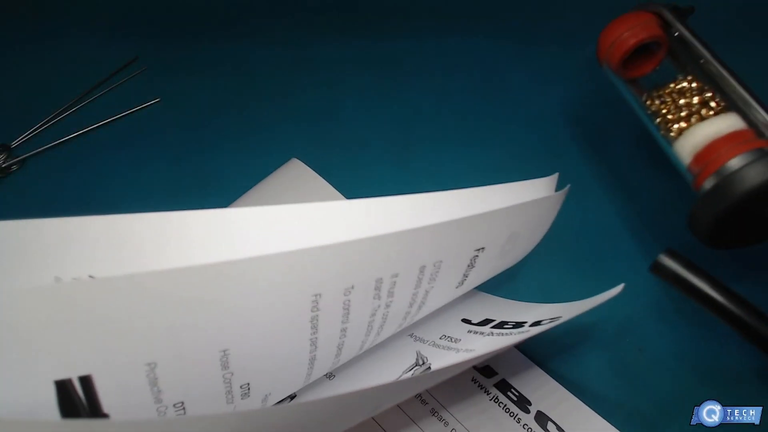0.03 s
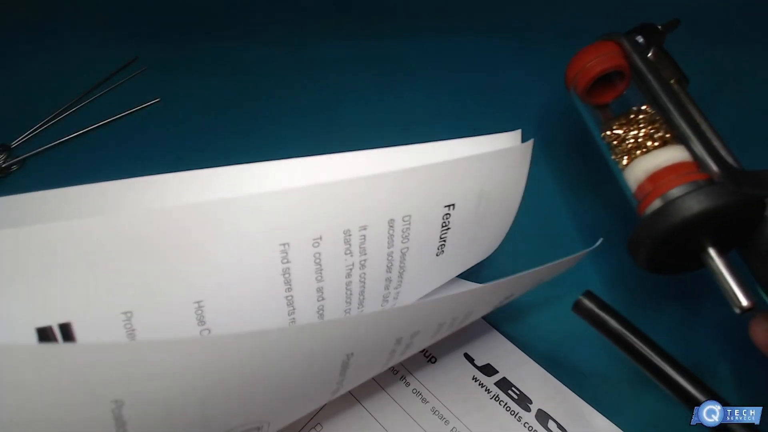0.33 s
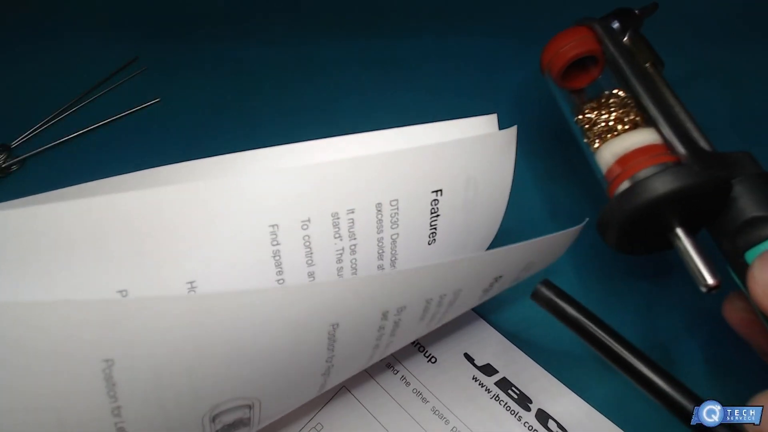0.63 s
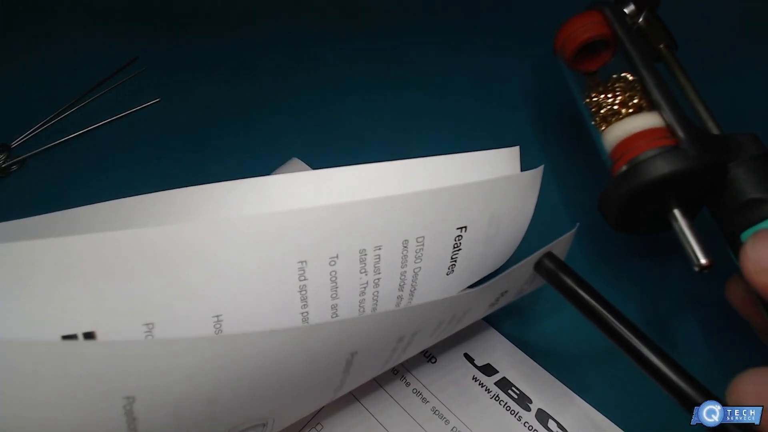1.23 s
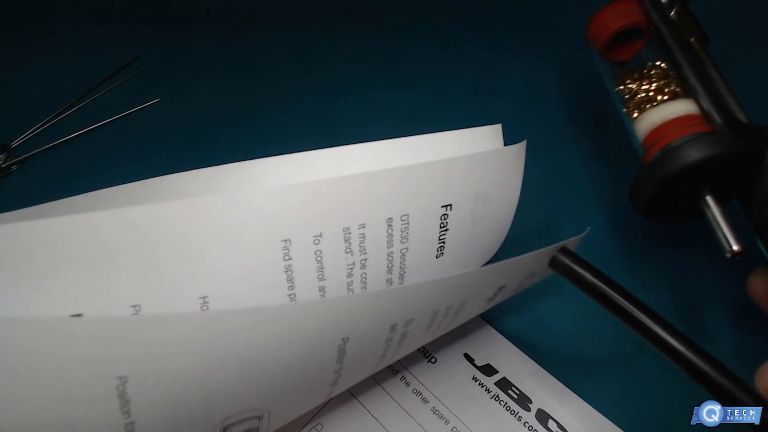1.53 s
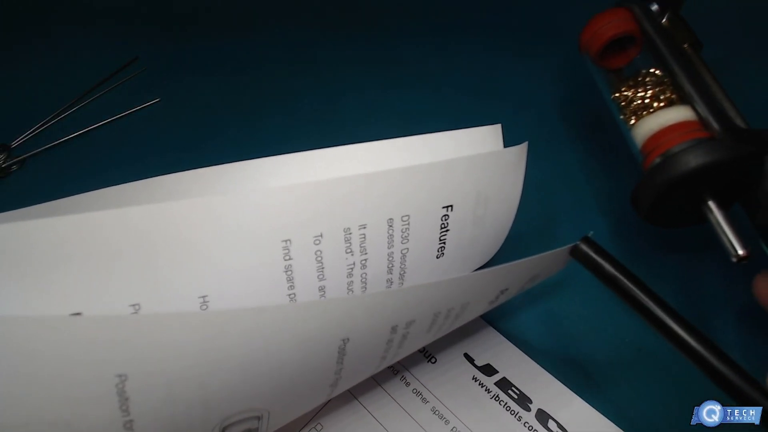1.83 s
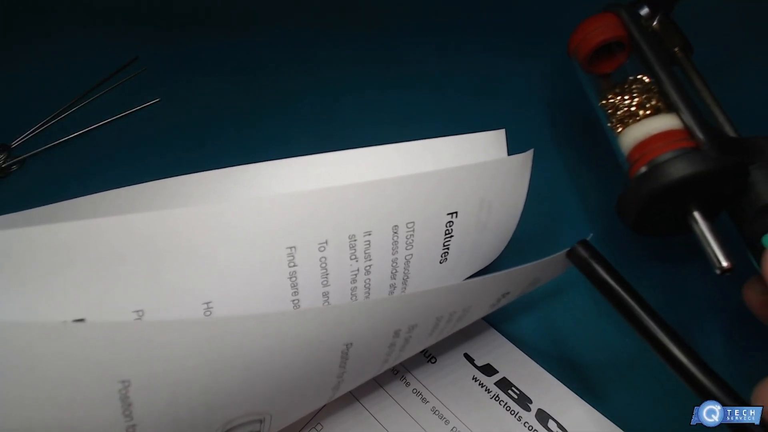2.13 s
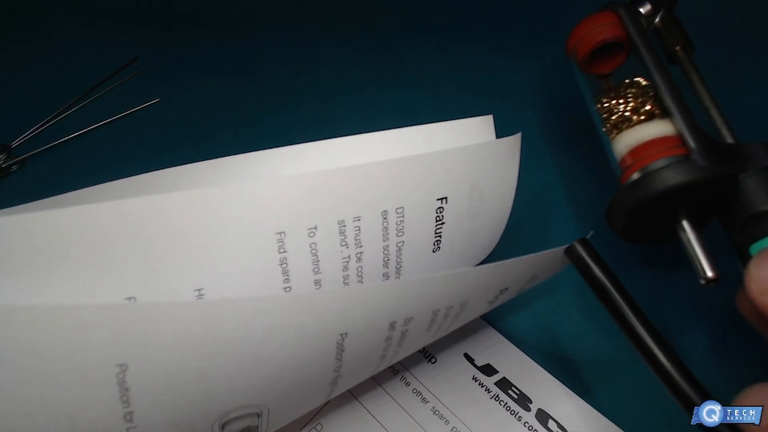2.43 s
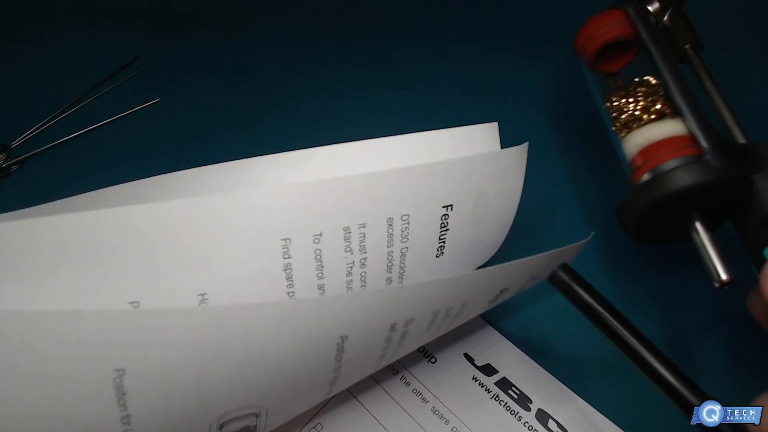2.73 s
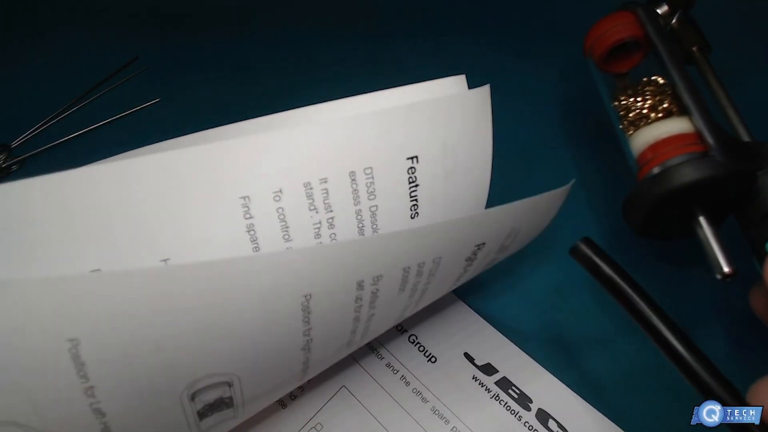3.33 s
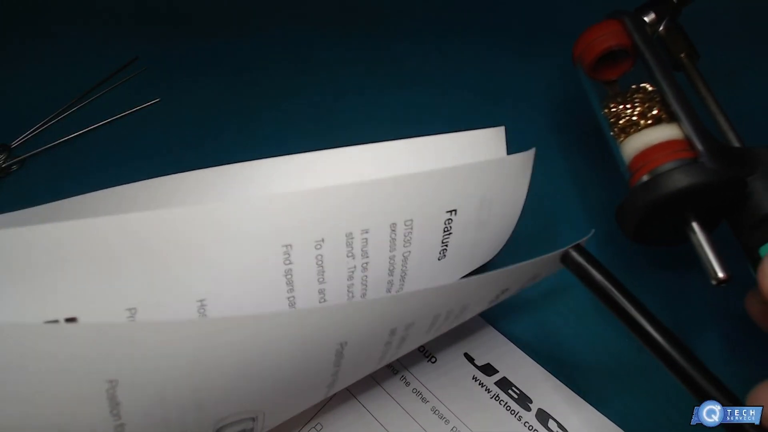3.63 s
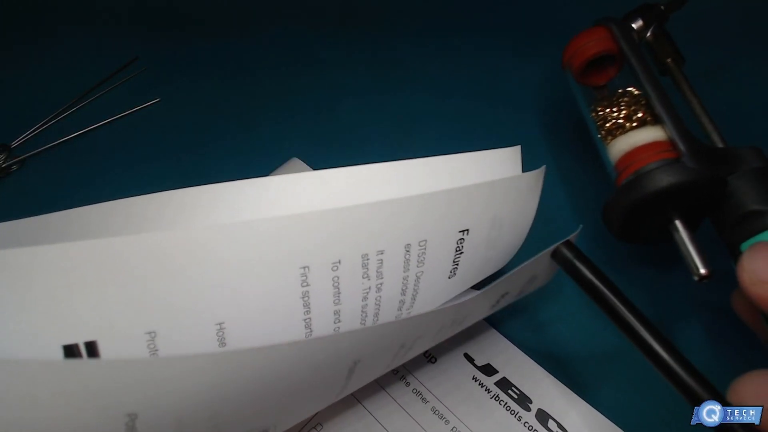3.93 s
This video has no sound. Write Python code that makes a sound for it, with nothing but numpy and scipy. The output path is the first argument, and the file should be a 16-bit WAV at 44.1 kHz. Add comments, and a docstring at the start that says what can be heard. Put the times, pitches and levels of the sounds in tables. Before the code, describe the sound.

Small electric pump clacks on, buzzes and hisses steadily, briefly faltering with a rattle.

```python
"""A small workshop, stereo microphone close to the bench, where a little electric diaphragm pump starts,
hums at about 80 turns a second, stumbles once and picks up again. Every turn shakes the housing, ticks
the valves and pushes a puff of air; the mechanism rattles and clacks whenever it spins up.
Behind it, to the right, a fan drones faintly in the room tone."""
import sys
import numpy as np
from scipy import signal
from scipy.fft import rfft, irfft, next_fast_len
from scipy.io import wavfile
from scipy.ndimage import map_coordinates

SR = 44100
rng = np.random.default_rng(int(sys.argv[2]) if len(sys.argv) > 2 else 0)


def generate_wav(sig):
    """Save sig (samples, or channels by samples) to the path in sys.argv[1] as 16-bit PCM at SR."""
    pcm = np.round(np.clip(np.atleast_2d(sig).T, -1, 1) * 32767).astype(np.int16)
    wavfile.write(sys.argv[1], SR, pcm)


N = 176400
RATED_HZ = 79  # turns a second in steady running
PUFF_PLACE = 0.68  # where in the turn (0-1) the air is pushed out


def hum(turns, speed_hz, slow):
    """The housing hums at multiples of the speed; the upper lines flutter and stir the room."""
    # housing lines (multiple of the speed, left level [dB], right level [dB], lead of the left [rad])
    lines = [(1, -32, -50, 1.5), (2, -35, -38, -1.0), (3, -29, -36, 1.3), (4, -27, -25, -1.2),
             (5, -25, -32, 1.4), (6, -39, -47, 2.4), (7, -46, -49, 0.4), (8, -39, -37, -1.5),
             (9, -37, -39, 2.4), (10, -36, -45, 2.9), (11, -35, -47, 2.5), (12, -39, -50, -2.8),
             (13, -37, -46, -1.0), (14, -47, -50, -1.9), (15, -44, -48, 0.0), (16, -53, -51, -0.4),
             (17, -45, -56, 0.7), (18, -50, -55, 0.9), (19, -60, -55, 2.5), (20, -50, -52, 0.3),
             (21, -53, -60, 1.2), (22, -49, -58, 0.8), (23, -57, -61, 0.0), (24, -53, -56, 0.5),
             (25, -51, -56, 1.1), (26, -55, -59, 1.4), (27, -54, -57, -0.4)]
    # swell of the strongest line, the fourth (time [s], gain [dB])
    fourth_swell = [(.59, -12.5), (.69, -10.5), (.79, 0), (1.25, 0.5), (1.58, 3.5), (1.8, -8), (2.02, -7),
                    (2.07, -8), (2.19, -9), (2.29, 0.5), (2.52, 2.5), (2.75, -1.5), (3.17, 2), (3.33, -3.5),
                    (3.44, 3), (3.66, -2.5), (3.86, 2.5), (4, 0)]
    swell_db = {4: curve(fourth_swell), 5: 0.21 * curve(fourth_swell)}
    thud_place, thud_scatter_cycles = 0.09717, 0.166  # the upper lines add up to one thud a turn
    flutter_db = 1.15 + 0.2634 * np.maximum(speed_hz - RATED_HZ, 0)
    stumble_db, stumble_rad = 3.5, 0.662  # the low lines waver at low speed
    speeds = np.linspace(40, 90, 500)
    low, upper = np.zeros((2, N)), np.zeros((2, N))
    for k, left_db, right_db, lead in lines:
        phase = 2 * np.pi * k * (turns - thud_place) + np.array([[lead], [-lead]]) / 2
        lift_db = np.interp(speed_hz, speeds, resonance_db(k * speeds) - resonance_db(k * RATED_HZ))
        size = np.sqrt(2) * amp([[left_db], [right_db]]) * amp(lift_db)
        if k <= 5:
            dispersion = 2 * np.pi * 0.164 * k ** 2  # the mounts spread these lines over the turn
            line = np.sin(phase - dispersion + stumble_rad * slow * wobble(55))
            low += size * line * amp(swell_db.get(k, 0) + stumble_db * slow * np.tanh(wobble(55)))
        else:
            line = np.sin(phase + 2 * np.pi * thud_scatter_cycles * rng.standard_normal())
            upper += size * line * amp(flutter_db * wobble(22.033))
    upper *= amp(-5 * slow)
    room_echo = amp(-11.5) * ring(upper, t60=0.377)
    return amp(-0.5) * (low + upper + room_echo)


def resonance_db(hz):
    """Lift that housing and bench give to a line as it crosses their resonances."""
    # resonances (centre [Hz], half width [Hz], boost [dB])
    modes = [(190, 16.6, -1), (322, 23.5, 3), (626.9, 16.47, 7.5), (865.5, 21, 10), (940.8, 4, 8.5),
             (1003, 13, 4.5), (1009.7, 16.6, 6.5), (1067, 13.7, -1), (1135.3, 18, 4.5), (1264, 4.4, 1),
             (1378.5, 11.7, 3.5), (1470, 14.3, 2), (1734, 27, 10), (1802, 21.5, 9.5), (1948, 28, 4)]
    return sum(db / (1 + ((hz - centre) / width) ** 2) for centre, width, db in modes)


def valves(turns):
    """Left of centre the valves tick several times a turn, and each stroke buzzes in the housing."""
    # valve ticks (place in the turn [0-1], relative level [dB])
    tick_pattern = [(.4, -7.5), (.5, 15), (.6, 4), (.7, 4), (0.819, -1.5)]
    # spectrum of the ticks (frequency [Hz], relative level [dB])
    tick_colour = [(1000, -24.5), (2000, -11), (2400, -4), (2850, -9), (3300, -32.5), (3750, -13),
                   (4200, -0.5), (5300, -8), (5900, -5), (7200, -2), (8300, 1), (9300, -11.5),
                   (10000, -4.5), (10800, -1.5), (11900, -32), (13200, -6), (15800, -27)]
    # spectrum of the housing's buzz (frequency [Hz], relative level [dB])
    buzz_colour = [(900, -15.5), (1500, -8), (2000, 0), (2400, -6), (2800, 8.5), (3300, -14), (3750, 4),
                   (4200, 0), (4700, -3.5), (5300, -3), (5900, -7.5), (6500, -6), (7500, -6.5),
                   (11000, -12), (15000, -33)]
    ticks = sum(amp(db) * ring(strokes(turns, place), t60=0.00261) for place, db in tick_pattern)
    ticks = coloured(ticks + amp(8.5) * ring(ticks, t60=0.36), tick_colour)
    buzz = coloured(ring(strokes(turns, place=0.75), t60=0.0918), buzz_colour)
    return amp(-48.5) * ticks * pan(3.2) + amp(-45) * buzz * pan(0.33)


def snap(turns):
    """A valve closes with a bright snap: a repeating ring and a spurt of air."""
    # spectrum of the snap (frequency [Hz], relative level [dB])
    colour = [(2000, -20), (3500, -8.5), (4200, -22.5), (5200, -19.5), (5900, -8), (7200, -8.5),
              (8400, 3.5), (9300, -6.5), (9950, 3.5), (10250, -5), (10650, 0.5), (11900, -9), (13300, 6.5),
              (14200, -22.5), (16000, -24.5)]
    place, t60 = 0.7, 0.009
    ringing = coloured(ring(strokes(turns, place, jitter_s=3e-6), t60), colour)
    since_closing_s = ((turns - place) % 1) / RATED_HZ
    spurt = unit(amp(-60 * since_closing_s / t60)) * noise(colour)
    return amp(-50) * (ringing + amp(-2) * spurt)


def airflow(turns):
    """Each turn pushes out a puff of hiss over a lower rush."""
    # spectrum of the puff (frequency [Hz], relative level [dB])
    puff_colour = [(880, -48.5), (1500, -4.5), (1540, -5), (1960, -4), (2480, -13.5), (2930, -0.5),
                   (3270, -23), (4100, -5.5), (5290, -17.5), (5780, -1), (7260, -18), (8490, -5),
                   (9370, -10), (10900, -21.5), (11900, -29.5), (13200, -6), (15800, -35)]
    # spectrum of the rush (frequency [Hz], relative level [dB])
    rush_colour = [(30, -11), (100, -4.5), (200, -12), (300, -0.5), (500, -6.5), (800, -5.5), (1200, -10),
                   (2000, -16), (3200, -16), (6000, -23.5)]
    puff = throb(turns - PUFF_PLACE, depth_db=1.5) * noise(puff_colour)
    rush = throb(turns, depth_db=1) * noise(rush_colour)
    return amp(-48.5) * puff * pan(3.6) + amp(-41) * rush


def strain(turns, speed_hz):
    """The air hisses more sharply when the load drags the motor down."""
    # spectrum of the labouring hiss (frequency [Hz], relative level [dB])
    colour = [(3000, -23), (5300, -9.5), (5900, -4.5), (6500, -13), (7600, -5), (8400, -2.5), (9200, -12),
              (12000, -26)]
    load = np.clip(RATED_HZ - speed_hz, 0, 1)
    return amp(-48) * load * throb(turns - PUFF_PLACE, depth_db=2.8) * noise(colour)


def rattle(turns, slow):
    """Below its rated speed the pump shakes on its mounts."""
    # spectrum of the rattle (frequency [Hz], relative level [dB])
    colour = [(40, -16.5), (110, -10.5), (180, -28), (350, 12), (500, 0.5), (700, -2), (1100, 0.5),
              (1800, -13.5), (3000, -17), (8000, -25), (15000, -47)]
    return amp(-30.5) * slow ** 0.396 * throb(turns, depth_db=2.27) * noise(colour)


def jolt(turns):
    """The body lurches on its mounts at switch-on: a thump, dead centre, at three times the speed."""
    peak_s, width_s = 0.5974, 0.0218
    swell = np.exp(-((np.arange(N) / SR - peak_s) / width_s) ** 2)
    return np.sqrt(2) * amp(-25) * swell * np.sin(3 * 2 * np.pi * turns)


def clacks():
    """Short bright knocks as the mechanism takes up the load."""
    # knocks on spinning up (time [s], level [dB], time to fall 60 dB [s])
    knocks = [(.556, -40, 0.042), (0.572, -37, 0.038), (.591, -31.5, 0.039), (0.604, -37, 0.108),
              (2.077, -34.5, 0.0662), (2.091, -32.5, 0.12), (2.106, -36, 0.096), (2.147, -38.5, 0.04),
              (2.16, -37, 0.138)]
    # spectrum of a knock (frequency [Hz], relative level [dB])
    colour = [(1000, -46), (2500, -3.5), (4500, 5), (8500, 5), (12000, -1.5), (13500, 1.5), (16000, -11)]
    t = np.arange(N) / SR
    envelope = sum((t >= s) * amp(db - 60 * np.abs(t - s) / t60) for s, db, t60 in knocks)
    return envelope * noise(colour)


def workshop():
    """Room tone, and the wavering drone of a fan to the right of the microphone."""
    # spectrum of the room tone (frequency [Hz], relative level [dB])
    room_colour = [(12, -39.5), (20, -10), (35, -16), (81, -21.5), (126, -16.5), (172, -26), (187, -9),
                   (276, -5.5), (317, -16), (524, -15.5), (570, -17), (866, -17.5), (1390, -25),
                   (1740, -23.5), (1890, -27), (2500, -26), (2720, -30), (3310, -31), (15800, -57.5)]
    # tones of the fan (frequency [Hz], level before panning [dB])
    fan_lines = [(150, -58), (242, -47), (274, -52.5), (431, -59), (711, -58.5), (851, -57)]
    t = np.arange(N) / SR
    fan = np.zeros(N)
    for hz, db in fan_lines:
        size = np.sqrt(2) * amp(db + 3.53 * wobble(18))
        fan += size * np.sin(2 * np.pi * hz * t + 0.5 * wobble(12))
    return amp(-38.5) * noise(room_colour) * pan(-2.3) + fan * pan(-7)


def strokes(turns, place, scatter_db=1, jitter_s=4e-6):
    """One slightly uneven pulse a turn, at a given place (0-1) in it."""
    at = np.interp(np.arange(1, int(turns[-1]) - 1) + place, turns, np.arange(N))
    chance = rng.standard_normal((N // 100, 2))[:len(at)]
    at = at + jitter_s * SR * chance[:, 0]
    taps = at.astype(int)[:, None] + np.arange(-7, 9)
    gap = taps - at[:, None]
    shape = np.sinc(gap) * np.cos(np.pi * gap / 16) ** 2  # lets a pulse fall between samples
    pulses = shape * amp(scatter_db * chance[:, 1:])
    return np.bincount(np.clip(taps, 0, N - 1).ravel(), pulses.ravel(), N)


def ring(x, t60):
    """x through a dense ring, different in each channel, that falls 60 dB in t60 seconds."""
    t = np.arange(SR // 3) / SR
    tail = rng.standard_normal((2, len(t))) * amp(-60 * t / t60)
    tail /= np.linalg.norm(tail, axis=1, keepdims=True)
    return signal.fftconvolve(np.atleast_2d(x), tail, axes=1)[:, :N]


def noise(spectrum):
    """Coloured stereo noise, its two sides more alike in the bass."""
    # likeness of left and right at the microphone (frequency [Hz], correlation [0-1])
    likeness = [(50, 0.167), (250, 0.426), (700, 0.154), (2000, 0.029), (10000, 0.042)]

    def mid_side_gains(hz):
        angle = np.arccos(along(likeness, hz)) / 2
        return np.array([np.cos(angle), np.sin(angle)])

    mid, side = filtered(rng.standard_normal((2, N)), mid_side_gains)
    return coloured(np.array([mid + side, mid - side]), spectrum)


def coloured(x, spectrum):
    """x shaped by a spectrum, at rms 1."""
    return unit(filtered(x, lambda hz: amp(along(spectrum, hz))))


def filtered(x, response):
    """x through a gain that depends on frequency."""
    m = next_fast_len(N + SR // 2)
    return irfft(rfft(x, m) * response(np.fft.rfftfreq(m, 1 / SR)), m)[..., :N]


def throb(turns, depth_db):
    """A gain that swells once a turn, at rms 1."""
    return unit(amp(depth_db * np.cos(2 * np.pi * turns)))


def wobble(rate):
    """A smooth random curve, rate knots a second."""
    knots = rng.standard_normal(int(N * rate / SR) + 4)
    return map_coordinates(knots, [np.arange(N) * rate / SR])


def curve(rows):
    """(time [s], value) points joined up, one value per sample."""
    return np.interp(np.arange(N) / SR, *np.transpose(rows))


def along(points, hz):
    """(frequency [Hz], value) points read at hz on a log axis."""
    freqs, values = np.transpose(points)
    return np.interp(np.log(hz + 1), np.log(freqs + 1), values)


def pan(left_db):
    """Channel gains that put the left left_db above the right."""
    return amp(np.array([[left_db], [-left_db]]) / 2)


def amp(db):
    """Gain of a level in dB."""
    return 10 ** (np.asarray(db) / 20)


def unit(x):
    """x scaled to rms 1."""
    return x / np.sqrt(np.mean(x ** 2) + 1e-20)


def scene():
    """The pump up front, running to one motor speed, with the workshop behind it."""
    # motor speed (time [s], turns a second [Hz])
    motor_speed = [(0.55, 47.82), (0.58, 57.61), (0.61, 65.84), (0.65, 73.21), (0.72, 78.58), (0.82, 79.48),
                   (1.28, 79.08), (1.5, 80.62), (1.72, 78.34), (2.035, 78.15), (2.09, 61.65),
                   (2.125, 68.74), (2.16, 74.46), (2.24, 78.53), (2.36, 79.34), (2.53, 79.95),
                   (2.66, 79.06), (2.96, 79.22), (3.12, 80.26), (3.32, 82.56), (3.49, 78.96), (3.7, 78.88),
                   (3.85, 79.69), (4, 81.3)]
    start_s, rise_s = 0.5282, 0.0744
    speed_hz = curve(motor_speed) + 0.0392 * wobble(20)
    turns = np.cumsum(speed_hz) / SR
    slow = np.clip((RATED_HZ - 1 - speed_hz) / 8.53, 0, 1)  # 0 near rated speed, 1 at full rattle
    running = np.clip((np.arange(N) / SR - start_s) / rise_s, 0, 1)
    pump = hum(turns, speed_hz, slow) + valves(turns) + snap(turns)
    pump = pump + airflow(turns) + strain(turns, speed_hz) + rattle(turns, slow)
    return running * pump + jolt(turns) + clacks() + workshop()


def record(dry):
    """The microphone chain passes nothing above 15.8 kHz."""
    return filtered(dry, lambda hz: hz < 15800)


dry = scene()
out = record(dry)
generate_wav(out)
```